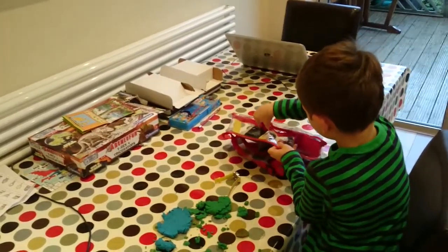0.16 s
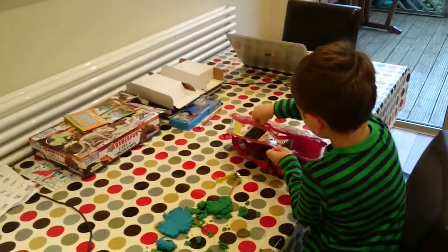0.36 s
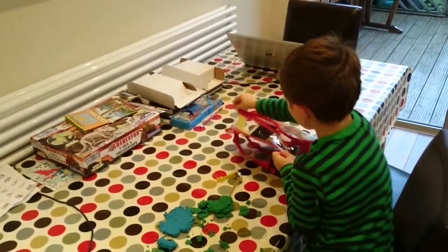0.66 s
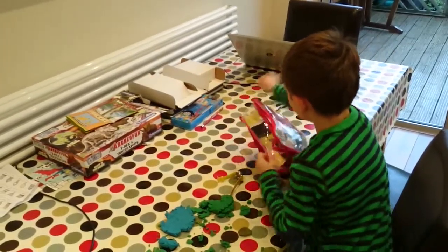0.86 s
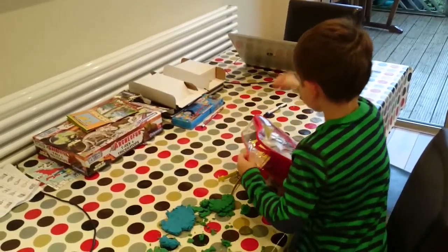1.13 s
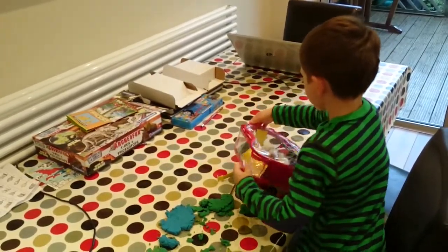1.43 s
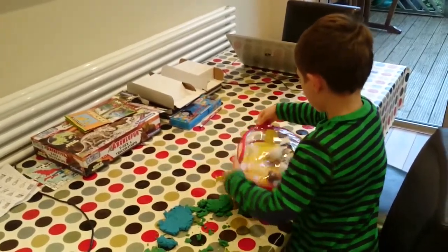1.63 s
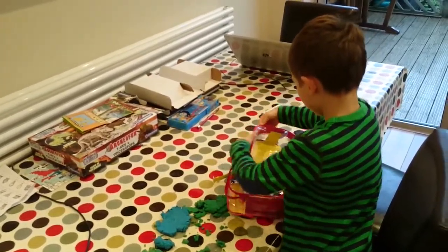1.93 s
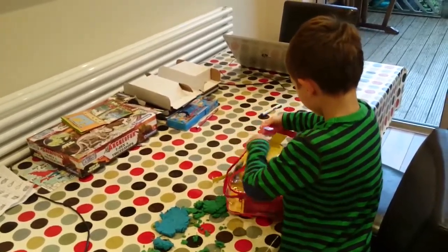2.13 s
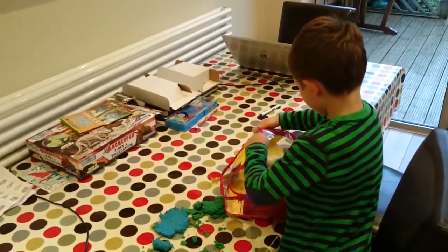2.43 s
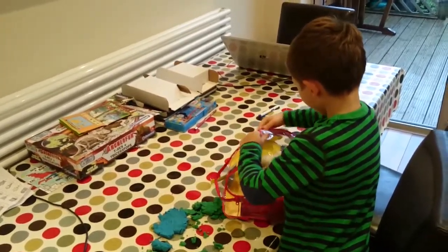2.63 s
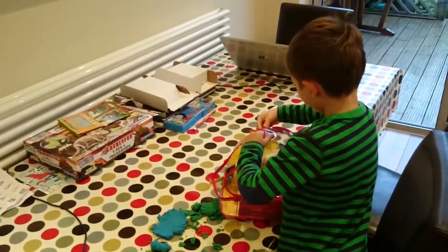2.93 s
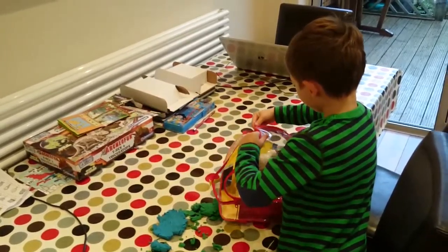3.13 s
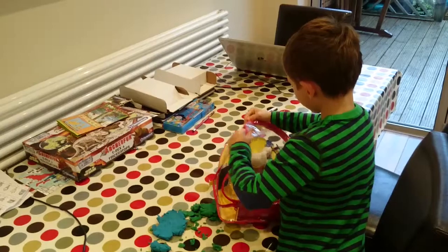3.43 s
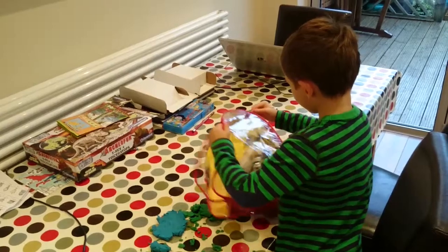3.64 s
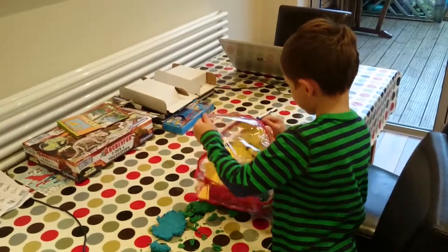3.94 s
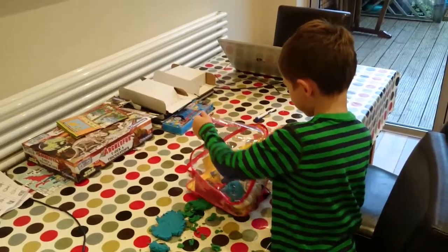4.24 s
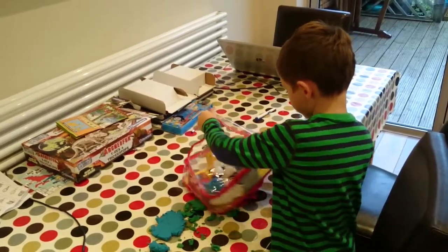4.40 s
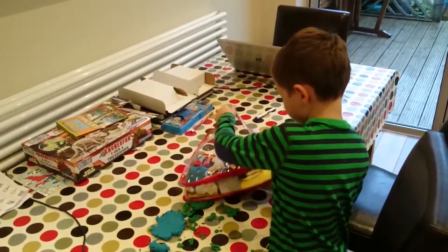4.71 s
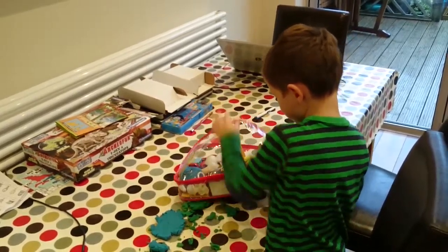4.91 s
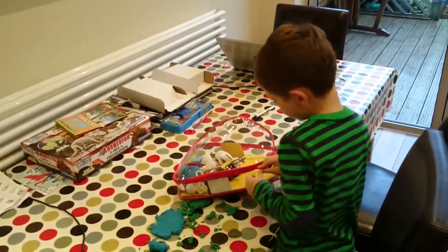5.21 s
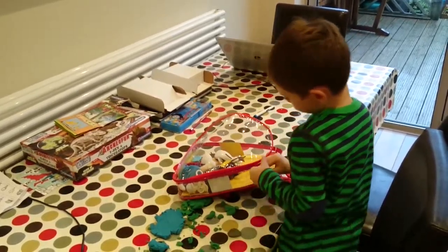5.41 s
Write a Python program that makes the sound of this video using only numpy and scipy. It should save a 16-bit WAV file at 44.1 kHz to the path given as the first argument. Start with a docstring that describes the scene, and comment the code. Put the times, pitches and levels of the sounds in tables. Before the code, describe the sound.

Jerky zipper pulls, crinkling plastic and the sharp clicks of small toys as a bag is opened in a bare room.

```python
"""Unzipping a toy bag

A child unzips a clear plastic toy bag on a table in a bare, echoing room and folds the lid back.
The slider rattles over the teeth in a few jerky pulls, the stiff sheet crinkles, the bag judders on
the table, and the toys and the pull tab click. A phone a step away hears it in wide stereo."""
import sys
import numpy as np
from scipy import signal
from scipy.fft import rfft, irfft
from scipy.io import wavfile

SR = 44100
rng = np.random.default_rng(int(sys.argv[2]) if len(sys.argv) > 2 else 0)


def unload_audio(sound):
    """Save the sound as a 16-bit wav file, at the path given as the first command line argument."""
    columns = np.transpose(np.atleast_2d(sound))
    # keep every value between -1 and 1, then stretch to whole-number steps
    steps = np.round(np.clip(columns, -1, 1) * 32767)
    wavfile.write(sys.argv[1], SR, steps.astype(np.int16))


N = 245371


def undb(db):
    """Decibels to gain."""
    return 10 ** (np.asarray(db) / 20)


def unit(x):
    """Scale to rms 1."""
    return x / np.sqrt(np.mean(x ** 2))


def at_pitch(points, hz):
    """Read (Hz, value) points on a log-frequency axis."""
    point_hz, value = np.transpose(points)
    return np.interp(np.log(np.maximum(hz, 1)), np.log(point_hz), value)


def eq(x, points, size=4096):
    """Minimum-phase EQ through (Hz, dB) points."""
    cepstrum = irfft(np.log(undb(at_pitch(points, np.arange(size // 2 + 1) * SR / size))))
    cepstrum[1:size // 2] *= 2
    cepstrum[size // 2 + 1:] = 0
    impulse = irfft(np.exp(rfft(cepstrum)))[:size // 2]
    return signal.oaconvolve(x, impulse)[:len(x)]


def whiten(x, size=4096, bands=38):
    """Flatten the spectrum of a random burst, keeping its fine texture."""
    power = np.abs(rfft(x)) ** 2
    edges = np.geomspace(150, 18000, bands + 1)
    bins = (edges * len(x) / SR).astype(int)
    band_power = np.add.reduceat(power, bins)[:-1] / np.diff(bins)
    centres = np.sqrt(edges[:-1] * edges[1:])
    return eq(x, np.c_[centres, -10 * np.log10(band_power)], size)


def resonate(x, hz, octaves, size=512):
    """Band-pass with a moving centre."""
    bin_hz, frame_s, frames = signal.stft(x, SR, nperseg=size)
    centre = np.interp(frame_s, np.arange(N) / SR, hz)
    gain = np.exp(-(np.log2(np.maximum(bin_hz[:, None], 1) / centre) / octaves) ** 2)
    return signal.istft(frames * gain, SR, nperseg=size)[1][:N]


def wander(rate_hz):
    """Smooth random drift with a spread near 1."""
    steps = rng.standard_normal(int(N / SR * rate_hz) + 2)
    return np.interp(np.arange(N) / SR * rate_hz, np.arange(len(steps)), steps)


def crackle(per_s, spread_db):
    """Random tiny snaps: many weak, a few strong."""
    strength = undb(spread_db * np.minimum(rng.exponential(size=N), 4))
    return unit((rng.random(N) < per_s / SR) * rng.choice([-1, 1], N) * strength)


def envelopes(strokes, attack_s, swell_db, release_s):
    """One envelope per hand stroke: it sets in, ramps by swell_db over its length and dies away."""
    start, length = np.transpose(strokes)[:2, :, None]
    age = np.arange(N) / SR - start
    attack = np.clip(age / attack_s, 0, 1)
    swell = undb(swell_db * (np.clip(age / length, 0, 1) - .5))
    release = np.exp(-np.clip((age - length) / release_s, 0, 20))
    return attack * swell * release


def loudness(effort, db):
    """Gain of overlapping strokes, which add in power."""
    return np.sqrt(undb(db) ** 2 @ effort ** 2)


def ride_bands(x, strokes, effort, low_db, treble_db, low_hz, treble_hz):
    """Hand strokes ride the faders of the lows, mids and treble of x."""
    low = signal.sosfiltfilt(signal.butter(2, low_hz, fs=SR, output="sos"), x)
    treble = signal.sosfiltfilt(signal.butter(2, treble_hz, "high", fs=SR, output="sos"), x)
    level, rasp, shine = np.transpose(strokes)[2:5]
    return (loudness(effort, level) * (x - low - treble)
            + loudness(effort, level + rasp + low_db) * low
            + loudness(effort, level + shine + treble_db) * treble)


# Room tone EQ. Each row: frequency in Hz, gain in dB.
ROOM_TONE_EQ = [(20, -21), (40, -14), (65, 13), (110, -1), (160, -11), (250, -2), (500, 5.5), (1500, 7),
                (4500, -0.5), (8000, 2), (11000, -6.5), (15500, -52)]
def room_tone(level_db=-73):
    """The quiet air of the room and the hiss of one microphone."""
    return undb(level_db) * unit(eq(rng.standard_normal(N), ROOM_TONE_EQ))


# The bare room's ring. Each row: frequency in Hz, seconds to fall 60 dB.
REVERB_TIMES = [(150, 1), (500, 0.84), (1400, 0.56), (3600, 0.63), (7000, 0.51), (14000, 0.36)]
def room(x, lag_s, tail_db, early_db=0, early_s=0.0074, build_s=0.0022, bands=8):
    """One microphone hears the direct sound, quick echoes off table and wall, then the room's ring."""
    t = np.arange(SR) / SR
    spectrum, hz = rfft(rng.standard_normal(SR)), np.arange(SR // 2 + 1)
    centres = np.geomspace(200, 15000, bands)
    tail = 0
    for centre, share in zip(centres, np.eye(bands)):
        band = irfft(spectrum * at_pitch(np.c_[centres, share], hz), SR)
        tail += band * np.exp(-np.log(1000) * t / at_pitch(REVERB_TIMES, centre))
    tail *= 1 - np.exp(-t / build_s)
    echoes = rng.standard_normal(SR) * (rng.random(SR) < .06)
    early = echoes * np.exp(-t / early_s) * (t > .001)
    response = (undb(early_db) * unit(early) + undb(tail_db) * unit(tail)) / np.sqrt(SR)
    response[int(lag_s * SR)] += 1  # direct sound
    return signal.oaconvolve(x, whiten(response))[:N]


# Table rumble EQ. Each row: frequency in Hz, gain in dB.
RUMBLE_EQ = [(25, -28), (45, -9), (65, -0.5), (110, -4), (160, -3), (225, -6), (320, -4), (600, -25)]
# Shoves of the bag. Each row: start in seconds, length in seconds, level in dB.
BAG_SHOVES = [(0.392, 0.79, -72.5), (1.7, 0.98, -77), (3.52, 0.14, -71.5), (3.69, 0.15, -63),
              (3.908, 0.12, -66), (4.2, 0.12, -72), (4.717, 0.29, -80)]
def bag_drag(judder_db=3, rest_db=-78):
    """The full bag judders over the table top at each shove, and faintly while it is held."""
    effort = envelopes(BAG_SHOVES, attack_s=0.02, swell_db=-0.5, release_s=0.12)  # the toys settle
    push = loudness(effort, np.array(BAG_SHOVES)[:, 2])
    rumble = unit(eq(rng.standard_normal(N), RUMBLE_EQ))
    return rumble * np.hypot(push, undb(rest_db)) * undb(judder_db * wander(20))


# Crinkle EQ. Each row: frequency in Hz, gain in dB.
CRINKLE_EQ = [(150, -34), (350, -16.5), (520, -8), (780, -3), (1000, -0.5), (1300, 1), (1900, 3),
              (2700, -1.5), (3600, 1), (4400, -4.5), (6500, -2), (8500, -5.5), (12000, -10.5),
              (15500, -14.5)]
# Flexes of the sheet. Each row: start and length in seconds, then relative level, low rasp and
# treble in dB.
SHEET_FLEXES = [ (0.0, 0.09, -66, -11, -7), (0.094, 0.065, -57.5, -23, -1.5), (0.922, 0.17, -52, -9, -11.5),
                (1.288, 0.17, -54.5, -3.5, -13), (1.681, 0.15, -51.5, -8.5, -13.5),
                (1.81, 0.17, -61, 0, -19), (2.034, 0.24, -65, -3.5, -11), (2.153, 0.05, -58.5, 1.5, -8),
                (2.634, 0.083, -58.5, 2.5, -8), (2.95, 0.19, -72, -11, -2.5),
                (3.468, 0.077, -59.5, -5, -13), (3.853, 0.18, -49.5, -9.5, -4),
                (4.015, 0.043, -48, -6, -9.5), (4.17, 0.13, -47.5, -4.5, -7.5),
                (4.355, 0.19, -59.5, -8.5, -10), (4.624, 0.18, -54.5, -8, -21),
                (4.734, 0.33, -51.5, -6, -13.5), (4.912, 0.07, -43.5, -13.5, -7),
                (5.038, 0.13, -56.5, -11.5, -19), (5.379, 0.31, -67, -3, -6)]
def sheet_crinkle(flutter_db=2, gain_db=3):
    """Creases of the stiff plastic buckle in uneven flurries, harder as it bends further."""
    flurries = crackle(per_s=1300, spread_db=3.5) * undb(flutter_db * wander(45))
    creases = unit(eq(flurries, CRINKLE_EQ))
    effort = envelopes(SHEET_FLEXES, attack_s=0.0062, swell_db=1.5, release_s=0.048)
    return undb(gain_db) * ride_bands(creases, SHEET_FLEXES, effort,
                                      low_db=9.5, treble_db=-0.5, low_hz=1030, treble_hz=5250)


# Modes of the hard plastic toys. Each row: frequency in Hz, relative level in dB, seconds to fall 60 dB.
PLASTIC_MODES = [(1350, -10, .025), (1830, -12, 0.047), (1914, 11, 0.097), (2120, 9, 0.027),
                 (3443, -4, 0.098), (3497, -5.5, 0.017), (3660, 6, 0.022)]
def toy_ring(t, body_hz, falloff_db_per_octave=9, detune=0.018):
    """Modes near the body's pitch are struck hardest; each toy is tuned a little differently."""
    tune = 1 + detune * rng.standard_normal()
    ring = 0
    for hz, db, t60 in PLASTIC_MODES:
        struck_db = db - falloff_db_per_octave * abs(np.log2(hz / body_hz))
        ring += undb(struck_db - 60 * t / t60) * np.sin(2 * np.pi * hz * tune * t)
    low_cut = signal.butter(2, 1100, "high", fs=SR, output="sos")  # small things radiate little bass
    return unit(signal.sosfilt(low_cut, ring))


# Plastic knock EQ. Each row: frequency in Hz, gain in dB.
KNOCK_EQ = [(150, -28), (350, -22.5), (550, -6.5), (850, -2.5), (1300, 1), (1900, 2.5), (2700, -2),
            (3600, -5.5), (4600, -5), (6500, -8), (8500, -9.5), (12000, -18), (15500, -22.5)]
# Clicks of toys and creases. Each row: start in seconds, relative level in dB, body pitch in Hz,
# low, bright and top EQ in dB, clatter decay in seconds, toy ring in dB.
TOY_CLICKS = [ (0.078, -62.5, 1980, 4, 10, -10, 0.0043, -25),
              (0.124, -55.5, 6900, -2, 9.5, -11, 0.0058, -20), (0.143, -44.5, 7500, 3, -1, 3, 0.0058, -22),
              (0.155, -34.5, 1640, 2.5, -8, -5, 0.0043, -29), (0.267, -50, 5440, -1, 0.5, 4.5, 0.0015, -29),
              (0.326, -50.5, 596, 5, -3, -15, 0.0053, -25), (0.452, -44, 3700, 3, 7, -16, .011, -8),
              (0.885, -45.5, 3500, 7, 1.5, 3, 0.0074, -11), (1.041, -34.5, 1557, 0.5, -3, -3, 0.016, -26),
              (1.094, -37, 1690, 9.5, 4, 6.5, 0.0079, -12), (1.165, -39.5, 1430, 10, 8, 8, .008, -32),
              (1.4, -42, 1200, -7, -4, -3, 0.012, -17), (1.426, -40, 1107, 4.5, -4, -9, .016, -28),
              (1.472, -33, 1430, -2, -10, -9, 0.0052, -26), (1.4865, -35.5, 4330, 3.5, 5, 1.5, 0.0069, -3),
              (1.494, -36, 1960, -8, 5, 3, 0.0037, 1.5), (1.515, -40.5, 3520, 2, -19, 5, 0.0091, 4.5),
              (1.709, -46, 1500, 4, -3, -22, 0.0025, -33), (1.805, -44.5, 1470, 4, -3, -4, 0.0026, -23),
              (1.886, -45, 1450, 0, -27, -25, .006, -23), (1.96, -50, 2300, -2, 0.5, -8, .0034, -27),
              (2.016, -63, 6500, -14, -1, 6, .0012, -29), (2.192, -47, 6000, -1, -2, -13, 0.01, -29),
              (2.213, -31, 1310, -3, -8, -19, 0.0094, -30), (2.242, -36, 1260, -4.5, -15, -13, .0055, -40),
              (2.253, -34.5, 2640, -3.5, -1, -2, 0.028, -26), (2.487, -47, 5540, 1.5, -7.5, -5, 0.017, -19),
              (2.62, -50.5, 2750, 4.5, -6, -12, 0.0045, -25), (2.633, -44, 700, 1.5, -40, -24, 0.011, -4),
              (2.68, -48, 1400, 9, -4, 6, .0066, -30), (2.706, -39.5, 3480, -2, -5, 4, 0.0054, -0.5),
              (2.718, -43, 2270, -1, -2.5, 6, 0.0035, -22), (2.884, -46, 2210, -2, -10, -20, 0.0037, -29),
              (3.464, -65.5, 1983, 2, 7, 10, 0.0074, -28), (3.654, -38.5, 1760, -6, 5, 3.5, 0.0039, -31),
              (3.753, -35, 3234, -14, 8, 12, 0.0053, -19), (3.769, -34, 6990, -3, 0.5, 13, 0.0065, -6),
              (3.888, -39, 2855, 3, 2, 7, .005, -22), (4.045, -41, 6850, 1, -0.5, 5.5, 0.0031, -18),
              (4.183, -41.5, 1190, 0, -5, -7, 0.024, -29), (4.298, -44, 1450, 2, 4.5, -5, 0.0032, -17),
              (4.343, -38.5, 1350, 4, -12, -11, 0.0032, -15), (4.603, -54, 2220, 4, 5.5, -1, 0.005, -17),
              (4.783, -45, 1760, 6, 2, -3, 0.0026, -25), (4.843, -44.5, 1770, 1, 0.5, 1, 0.0034, -20),
              (4.897, -44, 1710, 5, -5, -1, 0.0085, -23), (4.957, -38, 1790, 1, 6, 7.5, 0.033, -12),
              (5.138, -47, 1690, -6, -1, -17, .008, -28), (5.426, -54.5, 3200, -4, 5, 5, 0.0037, -6.5)]
# The pull tab snaps against the slider and bounces. Each row reads as for the toy clicks.
TAB_SNAP = [(2.2516, -30.5, 6000, -1.5, 6.2, -10, 0.00032, -12),
            (2.257, -40, 5700, 5.5, 3.7, -17, 0.00035, 6.5), (2.2596, -39, 6860, -4, 2.8, -5, 0.00049, -25)]
def clicks(hits, gain_db, body_db=7, body_octaves=0.47, size=4096):
    """Each click is a sharp contact and a short clatter in a hollow body; it also sets the toys ringing."""
    track, t = np.zeros(N + size), np.arange(size) / SR
    strength = np.sqrt(SR / 100 / size)  # packs the energy of 10 ms at rms 1 into a click
    grid_hz = np.geomspace(150, 16000, 60)
    for start_s, db, body_hz, low_db, bright_db, top_db, clatter_s, ring_db in hits:
        contact = whiten(rng.standard_normal(size) * np.exp(-t / clatter_s), size=1024)
        body = body_db * np.exp(-(np.log2(grid_hz / body_hz) / body_octaves) ** 2)
        knock = unit(eq(contact, np.c_[grid_hz, at_pitch(KNOCK_EQ, grid_hz) + body], size=1024))
        tone = [(900, low_db), (1600, 0), (3600, 0), (5800, bright_db), (7500, bright_db),
                (10500, top_db), (14000, 0.98 * top_db)]
        click = eq(knock, tone, size=512) + undb(ring_db) * toy_ring(t, body_hz)
        start = int(start_s * SR)
        track[start:start + size] += undb(db + gain_db) * strength * click
    return track[:N]


# Zip rasp EQ. Each row: frequency in Hz, gain in dB.
RASP_EQ = [(150, -27.5), (350, -11), (520, -1), (850, 0), (1300, 2.5), (1900, 3), (2700, -0.5), (3600, 1.5),
           (4400, -3.5), (6500, -5), (8500, -7.5), (10000, -8), (12500, -11.5), (15500, -12)]
# Short jerks of the zip. Each row: start and length in seconds, relative level, low rasp and treble
# in dB, full-speed tooth rate in Hz, hum in dB, panel pitch in Hz, relative panel ring in dB.
ZIP_PULLS = [ (0.35, 0.085, -49.5, -1.5, -7, 490, -11.5, 4460, -24),
             (0.435, 0.055, -47, 1, -3.5, 500.4, -10, 3870, -9),
             (0.485, 0.043, -44, -5.5, 0, 529.1, -13.5, 3900, -9.5),
             (0.53, 0.075, -42, -6.5, -10, 551.5, -22, 3900, -25),
             (0.611, 0.039, -43.5, -1, 1.5, 550.3, -9, 2100, -5.5),
             (0.66, 0.09, -44.5, -1.5, -7, 625, -8, 1940, -3),
             (0.765, 0.11, -53, 2.5, -3.5, 580, -13, 1420, -1.5),
             (1.023, 0.165, -40.5, -5.5, -13, 608.5, -17, 1620, -28),
             (3.505, 0.06, -50.5, -6.5, -10, 540, -22, 1718, -6.5),
             (3.567, 0.095, -47, 0, -4.5, 588.6, -4.5, 1750, -4),
             (3.666, 0.076, -40.5, -4, 1.5, 540.5, -10.5, 2000, -13),
             (3.739, 0.069, -42, -3, 1, 630, -8, 2073, -8)]
def zipper(jitter=.025, slowing=.2, sink_octaves_per_s=0.38,
           tooth_spread_db=3, scrape_db=1, waver_db=3, panel_trim_db=-2, gain_db=2):
    """The slider ticks over each tooth and scrapes the tape; the panel rings and hums at the tooth rate."""
    effort = envelopes(ZIP_PULLS, attack_s=.02, swell_db=3, release_s=.025)
    current_pull = np.array(ZIP_PULLS)[effort.argmax(axis=0)]
    start, *_, full_hz, hum_db, taut_hz, panel_db = current_pull.T
    # in each pull the slider gathers speed, then coasts, while the taut panel beside it slackens
    teeth_hz = full_hz * (1 - slowing * (1 - effort.max(axis=0)))
    panel_hz = taut_hz * 2 ** (-sink_octaves_per_s * (np.arange(N) / SR - start))
    teeth_passed = np.cumsum(teeth_hz * (1 + jitter * wander(250))) / SR
    impacts = np.diff(np.floor(teeth_passed), prepend=0)
    ticks = unit(impacts * undb(tooth_spread_db * rng.standard_normal(N)))
    force = ticks + undb(scrape_db) * crackle(per_s=4600, spread_db=6.5)
    panel = undb(panel_db + panel_trim_db) * unit(resonate(force, panel_hz, octaves=0.24))
    hum = undb(hum_db + waver_db * wander(25.02)) * np.sin(2 * np.pi * teeth_passed)
    rasp = unit(eq(force, RASP_EQ)) + panel + hum
    return undb(gain_db) * ride_bands(rasp, ZIP_PULLS, effort,
                                      low_db=3.5, treble_db=3.5, low_hz=1120, treble_hz=4800)


# Stereo balance. Each row: frequency in Hz, left minus right in dB.
BALANCE = [(100, -10), (650, -5.5), (1400, -5.5), (4000, -4.5), (7000, -7), (10000, -5.5), (12500, -5),
           (15000, 7)]
def scene():
    """Each part reaches two microphones by its own paths; the pull tab faces them and sounds driest."""
    rasp, crinkle = zipper(), sheet_crinkle()
    toys, tab = clicks(TOY_CLICKS, gain_db=2), clicks(TAB_SNAP, gain_db=-0.5)
    channels = []
    for lag_s, share in (0, .5), (.0003, -.5):  # left, right
        bag = room(rasp, lag_s, tail_db=1.5) + room(crinkle, lag_s, tail_db=3.5)
        bag += room(toys, lag_s, tail_db=3) + room(tab, lag_s, tail_db=-3.5, early_db=-1.5)
        channels.append(eq(bag, [(hz, share * db) for hz, db in BALANCE]))
    return np.array([bag + bag_drag() + room_tone() for bag in channels])


# Stereo width. Each row: frequency in Hz, side gain in dB.
SIDE_EQ = [(60, 7.5), (130, 7.5), (250, 10), (650, 9), (1200, 1.5), (1900, -1.5), (3800, 2), (8000, 0)]
def record(dry):
    """The phone widens the lows, cuts the top and rests slightly off zero."""
    top_hz, dc_offset = 15800, -.0004
    mid = (dry[0] + dry[1]) / 2
    side = eq((dry[0] - dry[1]) / 2, SIDE_EQ)
    high_cut = signal.ellip(10, .2, 70, top_hz, fs=SR, output="sos")
    return dc_offset + signal.sosfilt(high_cut, np.array([mid + side, mid - side]))


dry = scene()
out = record(dry)
unload_audio(out)
```